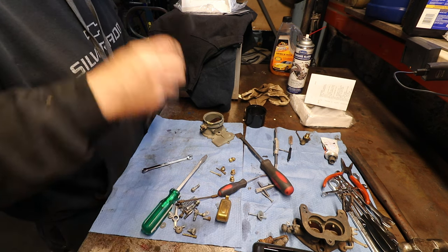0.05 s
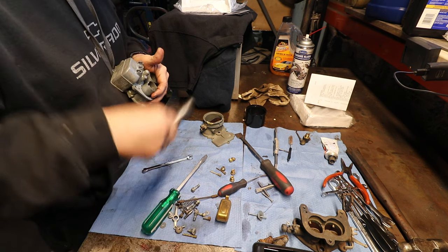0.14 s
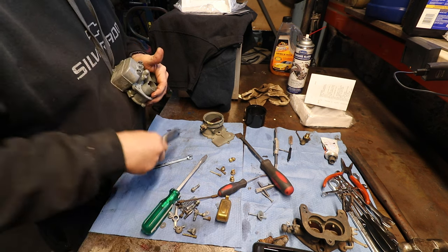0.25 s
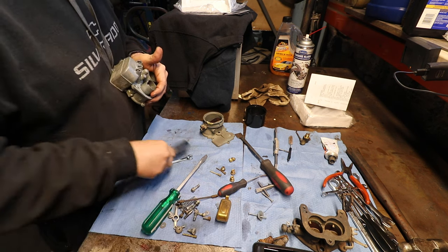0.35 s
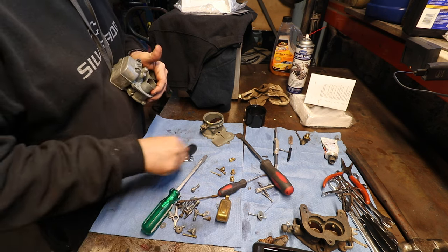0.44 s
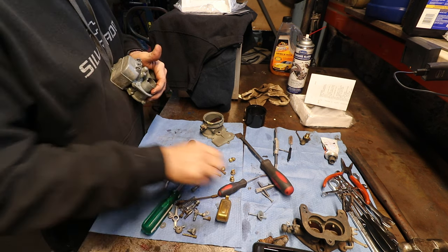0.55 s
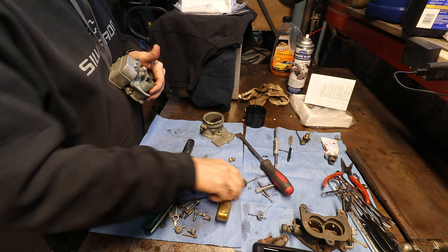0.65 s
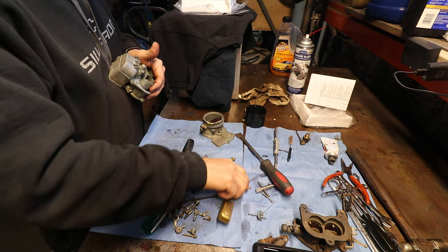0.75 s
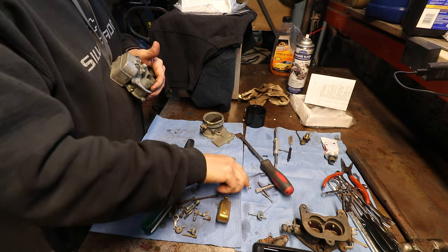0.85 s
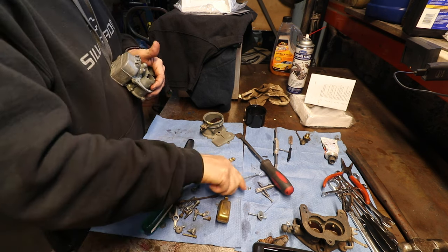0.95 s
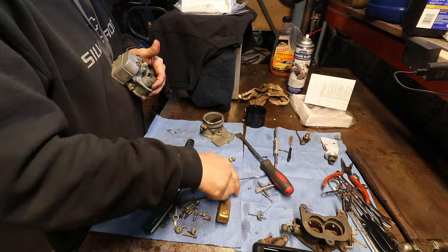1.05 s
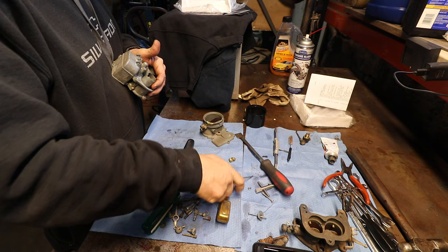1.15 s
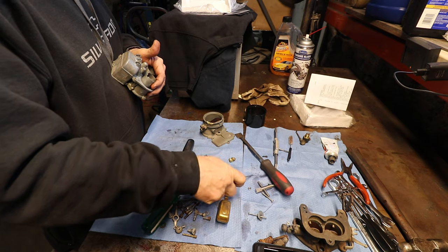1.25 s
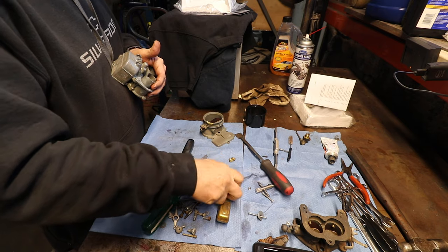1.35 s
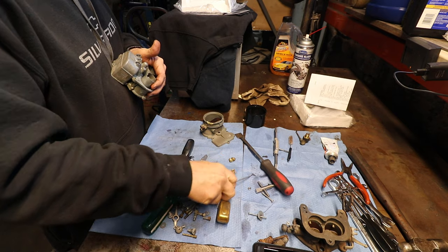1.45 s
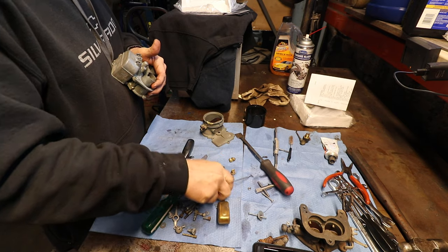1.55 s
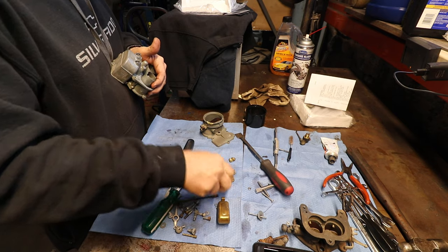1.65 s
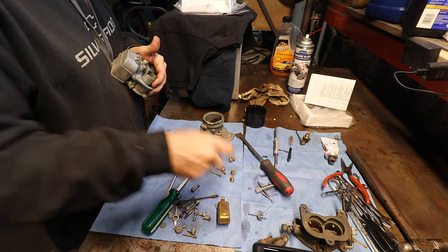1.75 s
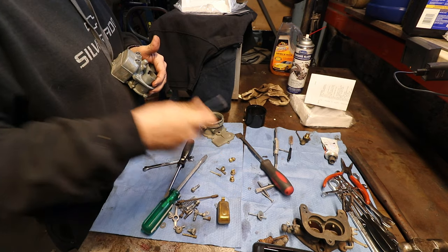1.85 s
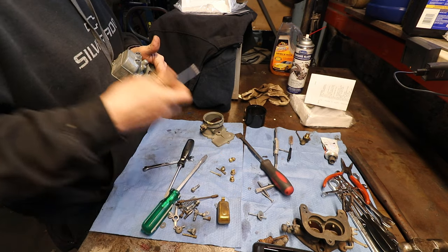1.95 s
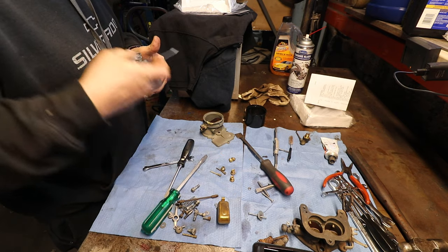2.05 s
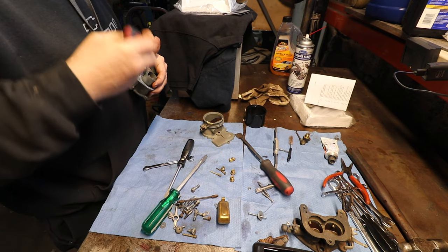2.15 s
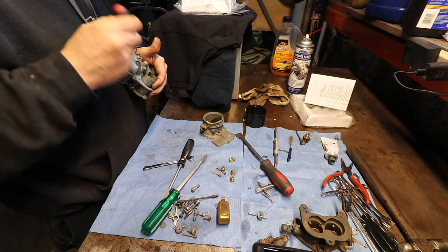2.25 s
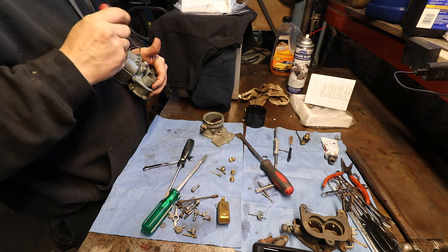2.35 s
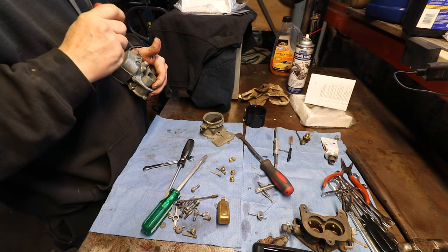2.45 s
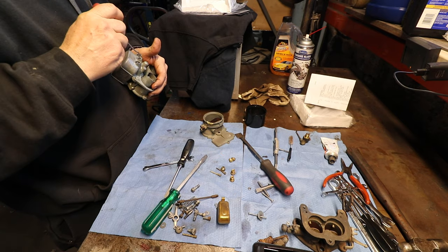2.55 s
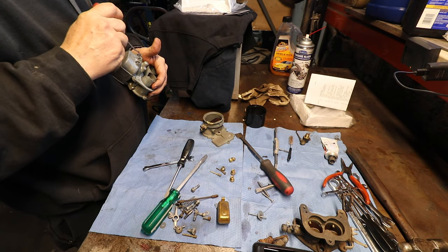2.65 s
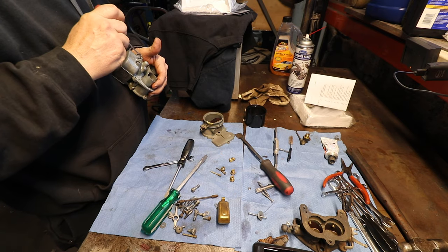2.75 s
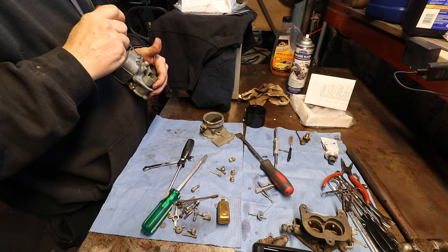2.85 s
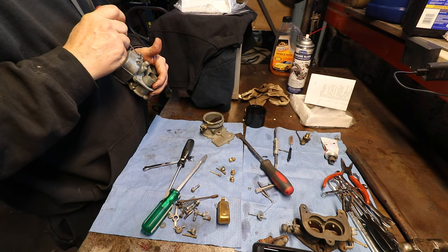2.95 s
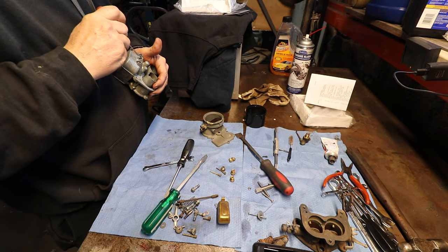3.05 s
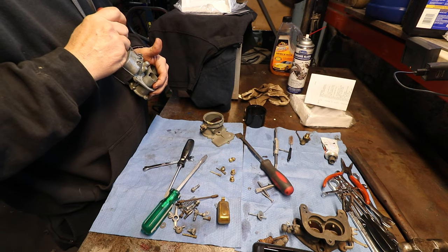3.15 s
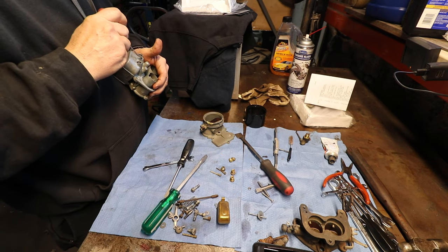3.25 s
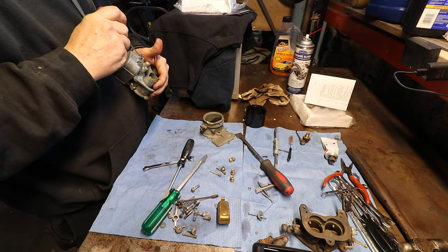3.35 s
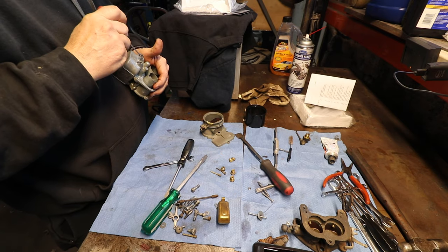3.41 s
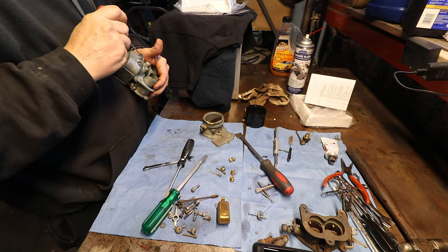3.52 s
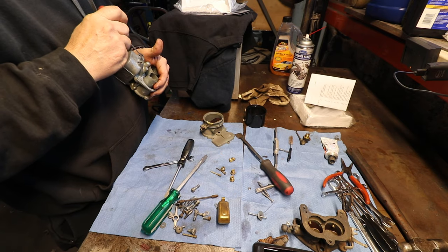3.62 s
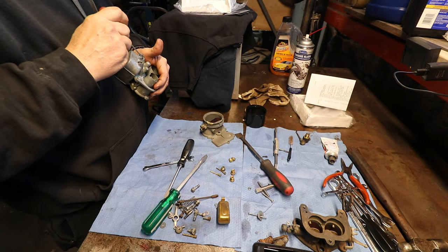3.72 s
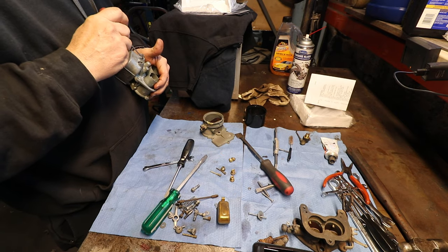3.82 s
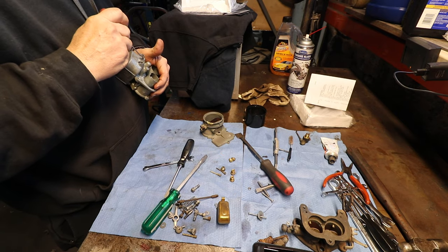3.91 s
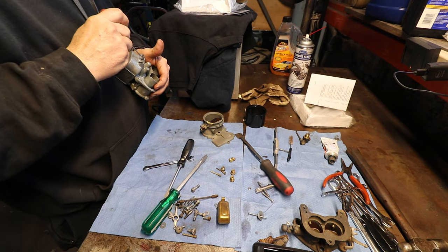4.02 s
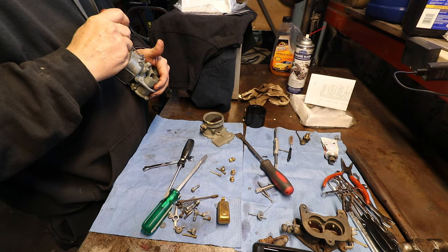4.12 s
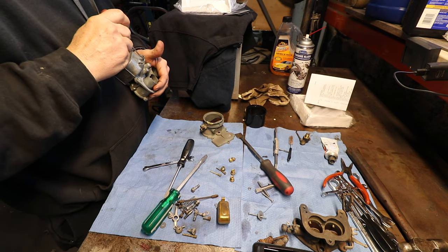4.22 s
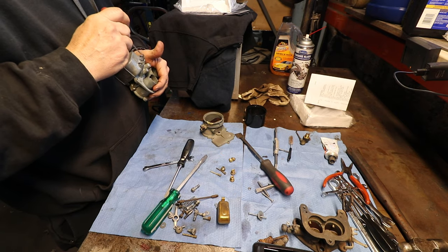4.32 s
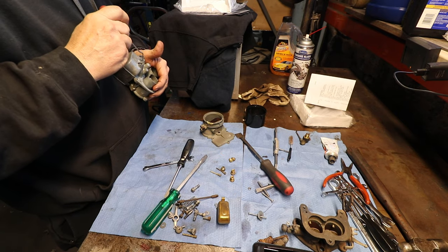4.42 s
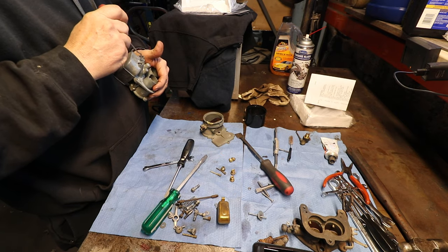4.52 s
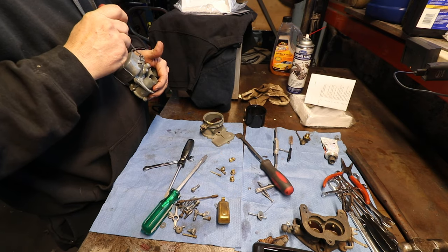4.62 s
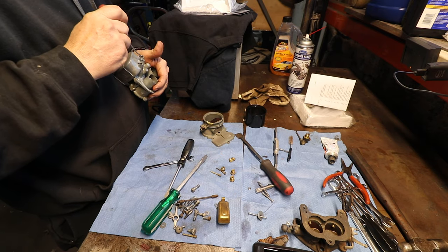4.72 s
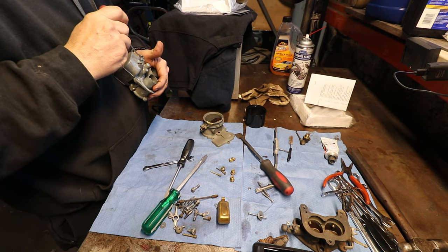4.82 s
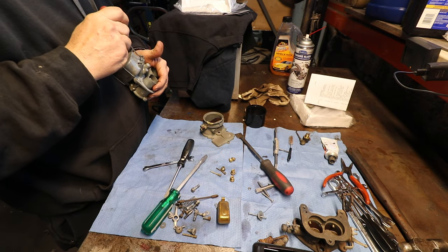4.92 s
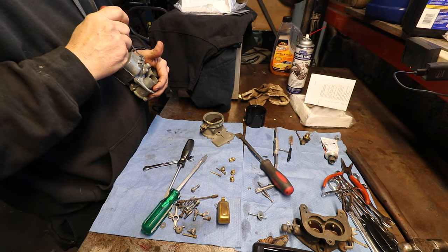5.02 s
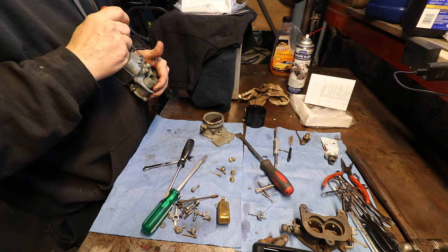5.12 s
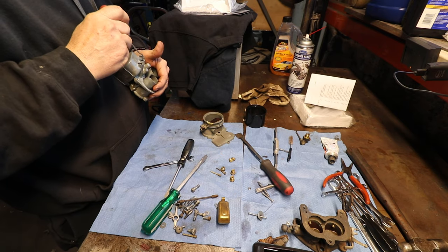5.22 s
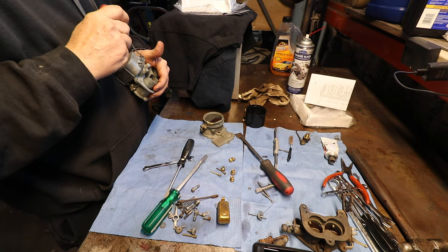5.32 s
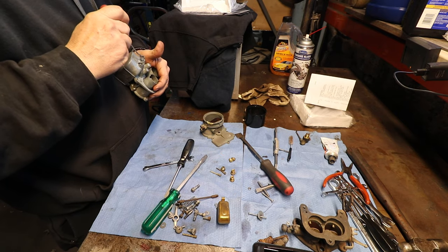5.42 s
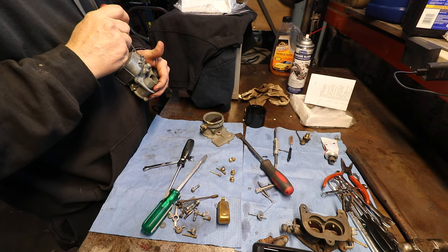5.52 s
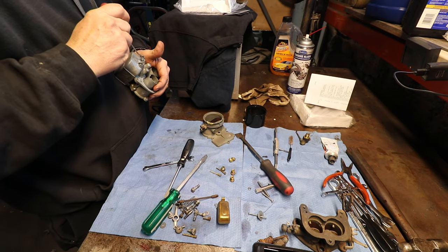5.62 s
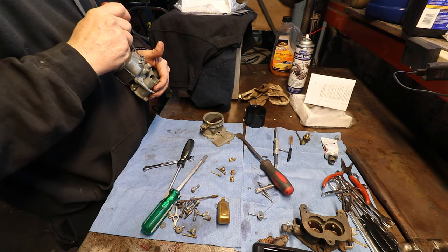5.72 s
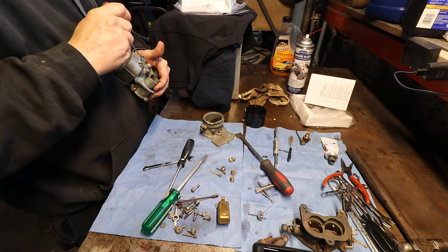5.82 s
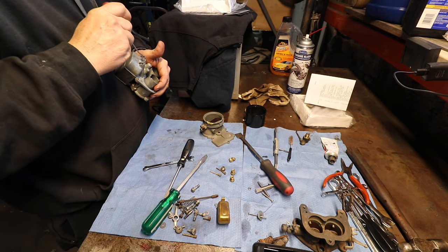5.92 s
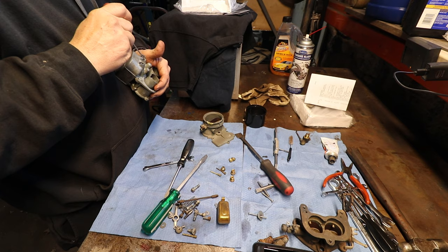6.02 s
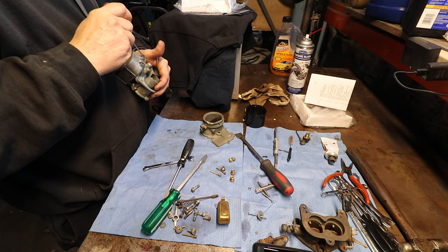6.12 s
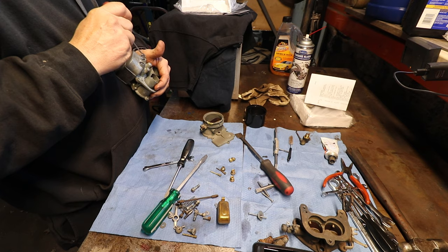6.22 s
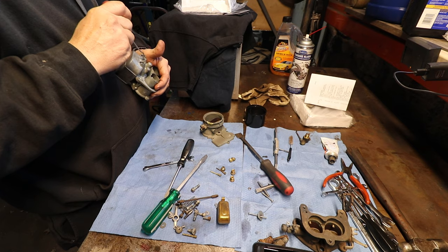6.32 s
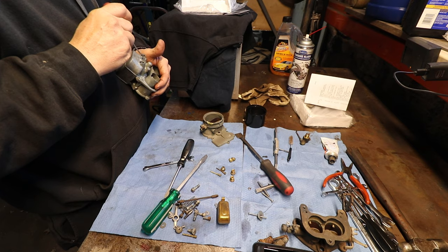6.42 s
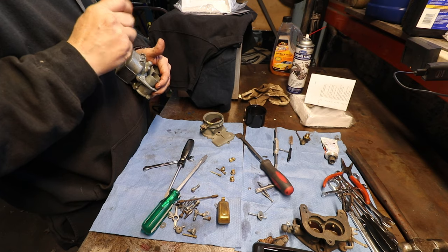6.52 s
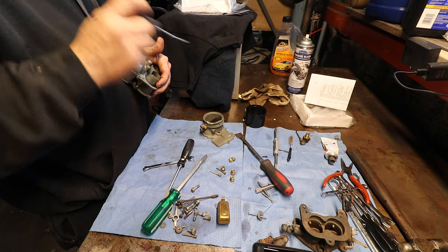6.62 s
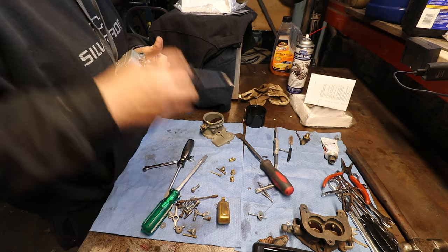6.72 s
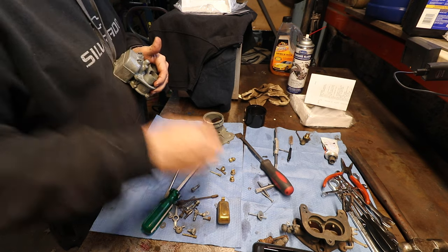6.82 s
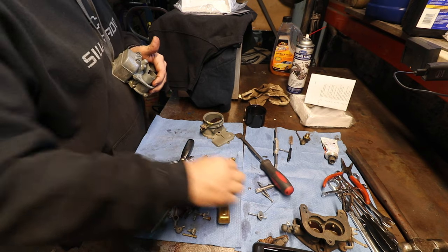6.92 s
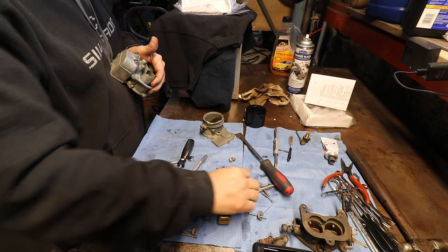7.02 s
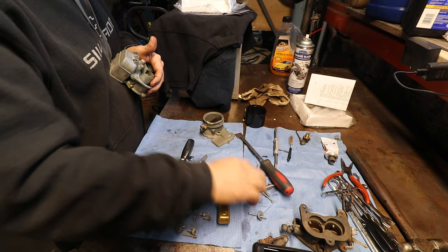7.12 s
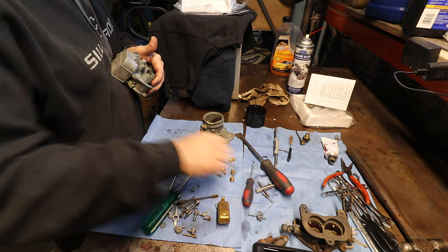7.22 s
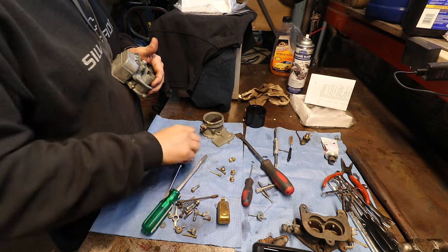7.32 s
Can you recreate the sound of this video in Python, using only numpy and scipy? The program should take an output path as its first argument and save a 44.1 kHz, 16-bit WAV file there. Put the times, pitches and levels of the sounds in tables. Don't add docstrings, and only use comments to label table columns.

```python
import sys
import numpy as np
from scipy import signal
from scipy.fft import rfft, irfft, next_fast_len
from scipy.io import wavfile
from scipy.ndimage import map_coordinates

SR = 44100
rng = np.random.default_rng(int(sys.argv[2]) if len(sys.argv) > 2 else 0)


def volts_from_decibels(level):
    exponent = np.asarray(level, float) / 20
    return 10 ** exponent


def waveform_to_disk(signal):
    frames = np.transpose(np.atleast_2d(signal))
    scaled = np.clip(frames, -1, 1) * 32767
    samples = np.round(scaled).astype(np.int16)
    wavfile.write(sys.argv[1], SR, samples)


N = 324576
T = np.arange(SR // 3) / SR

# [f/Hz, rms level/dB]
HUM = [(60.005, -50), (20, -71), (82.1, -71), (136.8, -74), (155.9, -76), (240, -75), (300, -77)]
# [f/Hz, density/dB per Hz]
AIR = [(10, -31), (24, -26.5), (38, -13), (48, -26.5), (70, -15.5), (110, -15), (135, -13), (267, -20.5),
       (450, -26), (560, -19.5), (889, -21.5), (1720, -30.5), (2400, -34.5), (5000, -39), (16000, -41.5)]
# [f/Hz, width/Hz, level over the air noise/dB]
CASING = [(139, 23.4, 1.5), (304, 12.5, 7), (384.3, 52, 5.5), (526, 54, 4), (750, 10.6, 6.5),
          (892.2, 34.5, 11), (1050, 14, -2), (1120, 18, 1.5), (1253, 18, 6), (1357, 35, 10),
          (2150, 114, 8.5), (2900, 300, 4)]
# [f/Hz, density/dB per Hz]
APART = [(24, -60.5), (40, -28), (185, -3.5), (852, -15.5), (1760, -19.5), (2630, -18), (5720, -13),
         (16000, -15)]
# [t/s, level/dB]
SLEEVE = [(0.0, -64), (0.53, -64), (0.67, -60.5), (0.88, -64), (0.96, -60), (1.35, -64), (1.52, -63),
          (1.76, -61.5), (2.87, -65), (4.78, -65), (4.94, -64), (5.27, -65.5), (6.6, -65.5), (6.8, -64),
          (7.22, -63.5), (7.36, -62.5)]
# [f/Hz, density/dB per Hz]
CLOTH = [(500, -18.5), (1500, -0.5), (3000, 1.5), (6000, -9), (14000, -14)]
# [f/Hz, t60/s]
ROOM = [(150, 0.86), (1000, 0.55), (4000, 0.19), (12000, 0.29)]

# [f/Hz, width/Hz, level/dB]
BENCH_FAR = [(150.8, 82, -8.5), (203, 97, -9), (320.2, 69, -6), (503, 37, -6.5), (695, 66, -4),
             (818.5, 29, -7.5), (900, 72, -4.5), (1046, 260, -13.5), (1450, 100, -15)]
# [f/Hz, width/Hz, level/dB]
BENCH_NEAR = [(124, 67, -9), (244, 89, -0.5), (480, 115, -1.5), (764, 160, -5.5), (970, 280, -13),
              (1420, 350, -22.5)]
# [f/Hz, width/Hz, level/dB]
DROP_CONTACT = [(1400, 940, 2.5), (2400, 1250, 8), (4400, 2700, -0.5)]
# [f/Hz, width/Hz, level/dB]
TOWEL_CONTACT = [(1500, 600, -4), (2180, 580, 7.5), (2900, 940, 4.5), (3600, 500, 0.5)]
# [f/Hz, width/Hz, level/dB]
BIT = [(1400, 630, 7), (2420, 1000, 6), (3280, 820, 5), (4400, 690, 3)]

# [t/s, peak level/dB, clack f/Hz, bench thud level/dB]
DROP_STEEL = [
    (.494, -3.5, 3180, -31),
    (.49492, -9.5, 3260, -24),
    (.5102, -14, 2910, -36),
    (.5628, -9, 4130, -19),
    (.5911, -17.5, 2740, -22.5),
    (.638, -34.5, 3000, -39),
    (.643, -45, 2900, -35),
]
# [t/s, peak level/dB, clack f/Hz, bench thud level/dB]
DROP_HANDLE = [(0.5007, -12.5, 3360, -29.5), (.512, -15.5, 2260, -37), (.517, -23, 2260, -25),
               (.531, -23, 2400, -23), (.549, -25, 2650, -21.5), (.5695, -13, 4230, -23.5),
               (.574, -21.5, 4070, -21), (.583, -26, 3950, -30.5), (.613, -41, 2980, -29.5),
               (0.627, -28, 2330, -30.5), (.634, -26, 2400, -29)]
# [t/s, peak level/dB, clack f/Hz, bench thud level/dB]
LAID_STEEL = [
    (7.2325, -43, 5440, -30.5),
]
# [t/s, peak level/dB, clack f/Hz, bench thud level/dB]
LAID_HANDLE = [
    (7.2296, -40, 2480, -33),
    (7.239, -58, 2000, -36),
    (7.253, -27, 2730, -48),
    (7.253, -32.5, 3470, -48),
    (7.2564, -35, 2190, -39),
    (7.268, -57, 2200, -40),
    (7.30, -56, 2500, -43.5),
]
FIRST_T60_S, T60_GROWS, LAST_T60_S = 0.0092, 0.86, 0.021

SOCKET_HZ = [4167, 4893, 6923, 9216, 10490, 11510, 14660, 7180, 4900, 11510, 14670, 4170]
# [level/dB, start t/s, rise/s, damped from t/s, t60 once damped/s]
SOCKET = [(-33.5, .525, 0.02, .585, 0.076), (-32, .522, .04, 0.58, 0.21), (-33.5, .512, .009, .568, .04),
          (-42.5, .505, 0.034, 0.58, .08), (-48.5, .505, .01, .585, .3), (-40, .495, .04, 0.59, .09),
          (-43, .5, .012, .518, .07), (-47, .563, .002, 0.567, .15), (-34, .497, .01, .515, .05),
          (-58, .615, .02, 0.69, .08), (-46, .548, .012, .565, .2), (-59, 0.54, .01, .63, .3)]
FREE_T60_S = 1.5

# [t/s, f/Hz, level/dB, t60/s]
PINGS = [(.494, 4900, -14.5, 0.0083), (.494, 5500, -24, 0.0089), (.592, 7200, -31.5, 0.048),
         (0.639, 7150, -54, 0.045), (.7415, 1736, -56, 0.39), (.7415, 1960, -49, 0.34),
         (1.565, 3200, -56, 0.6), (1.55, 1860, -46, .06), (.8, 4970, -51, 0.12), (.95, 6560, -43, .05),
         (.795, 14060, -63, 0.074), (.797, 7800, -59, .08)]
# [t/s, f/Hz, level/dB, t60/s]
SLIDES = [(.7403, 4500, -38, .006), (.742, 9500, -55, .15), (.772, 3456, -52, .1), (.797, 3854, -50, .06),
          (.772, 5800, -57, 0.077), (.76, 3500, -58, .7), (.96, 3590, -57, 0.37), (1.543, 2850, -46, .03),
          (1.543, 9500, -55, .12), (1.545, 11690, -60, .1), (1.55, 4970, -54, .1), (1.575, 1900, -56, .45),
          (1.56, 2974, -50, .2), (1.707, 9200, -50, .02)]
# [t/s, f/Hz, level/dB, t60/s]
BOOMS = [(0.4942, 339, -21, 0.054), (.4945, 480, -22, 0.047), (.549, 334, -24, 0.044),
         (.549, 500, -25, 0.049), (.564, 1000, -24, .03), (.567, 700, -27, 0.072), (.573, 881, -19, 0.049),
         (.585, 912, -21.5, 0.06), (.57, 150.6, -35.5, 0.34), (.58, 200, -36, 0.32),
         (.6, 1050, -32.5, 0.095), (.612, 309, -32, 0.11), (.615, 800, -36, 0.089), (.642, 845, -35, 0.13),
         (.7, 883, -41, .1), (.722, 812, -46.5, 0.57), (1.02, 189, -46.5, 0.15), (7.2295, 269, -29, .07),
         (7.2297, 490, -38, .04), (7.238, 480, -30, .04), (7.235, 177, -37.5, .15), (7.24, 110, -44, .2),
         (7.266, 300, -34, .1), (7.284, 239, -40, .1)]
# [t/s, f/Hz, level/dB, t60/s]
SETTLES = [(7.232, 9200, -57, .09), (7.254, 9350, -58, .032), (7.233, 10500, -53, .025),
           (7.234, 15200, -49, .07), (7.234, 5760, -57, .05), (7.2535, 2650, -39, .05)]
# [t/s, f/Hz, level/dB, t60/s]
SPITS = [(.494, 6450, -24, .014), (.494, 9340, -37.5, .019), (.494, 11600, -34, .02),
         (.494, 12850, -36, .02), (.51, 8300, -42.5, .03), (.51, 12400, -42, .025), (.563, 7262, -36, .035),
         (.563, 8683, -42.5, .025), (.563, 11660, -38, 0.022), (.563, 14710, -38, .025)]

# [t/s, length/s, level/dB, f/Hz]
RUSTLES = [(.497, 0.049, -47, 2280), (.565, .06, -44, 2080), (.745, .13, -52.5, 4200),
           (.83, 0.17, -69, 3500), (1.5, 0.042, -64, 3700), (1.54, 0.043, -52.5, 3300),
           (1.87, 0.13, -60.5, 4040), (2.82, 0.039, -65, 2900), (4.335, .09, -61, 4200),
           (4.97, 0.13, -66, 4000), (1.543, .05, -62, 10000), (.745, .13, -62, 2950),
           (.595, .06, -48, 1900), (6.63, 0.19, -62, 3200)]
# [t/s, length/s, level/dB, f/Hz]
BRUSHES = [
    (1.13, 0.093, -58.5, 6000),
    (1.181, 0.033, -58.5, 4760),
    (1.703, .036, -53.5, 5000),
]
# [t/s, length/s, level/dB, f/Hz]
GRINDS = [(4.334, 0.05, -59, 3800), (4.385, .04, -64, 3800), (4.975, .065, -65, 3470),
          (5.05, 0.037, -66, 3800), (3.22, 0.015, -60.5, 3300), (6.038, .014, -61, 3300),
          (6.062, .008, -61.5, 3500), (.632, .02, -47.5, 2900), (7.253, .012, -52, 3500)]
# [t/s, length/s, level/dB, start f/Hz, end f/Hz]
SQUEAKS = [
    (1.708, 0.025, -64, 2900, 2700),
    (4.335, .022, -63.5, 3100, 3150),
    (4.362, .02, -60, 3030, 3100),
    (4.386, 0.044, -60, 3030, 2700),
    (4.338, .075, -73, 4500, 4200),
]
SAG, RUSTLE_OCT, BRUSH_OCT, SQUEAK_OCT, GRIND_OCT = .86, 0.48, .8, 0.09, 0.23

LONG_HZ = [3548, 3601, 3900, 4280, 4970, 5373, 6180, 7375, 8037, 9450, 10590, 12150, 13200, 15300]
SHORT_HZ = [1976, 2974, 4970, 4280, 6470, 6891, 7070, 7800, 8775, 10140, 11690, 14060, 1736]
# [level/dB, t60/s]
LONG = [(-0.5, 0.17), (1, 0.18), (-21, .22), (-22, 0.16), (-15, 0.11), (-23, 0.16), (-14, .07), (-20, .1),
        (-21.5, .2), (-7.5, 0.06), (-20, 0.089), (-9, 0.048), (-19, 0.044), (-22, .06)]
# [level/dB, t60/s]
SHORT = [(-4.5, 0.31), (-1, 0.23), (-11, 0.13), (-19, .23), (-15, .08), (-11.5, 0.14), (-15, .1), (-25, .1),
         (-12.5, 0.1), (-16, .076), (-10.5, .079), (-24, .05), (-24, 0.28)]
# [t/s, level/dB]
CLINKS = [
    [(.7405, -33), (.7435, -34), (.7715, -44), (.792, -49), (.8, -45), (.833, -53), (.852, -60)],
    [(.9485, -43), (.9497, -26.5)],
    [(1.543, -52), (1.5484, -46), (1.553, -41)],
    [(1.5594, -35.5), (1.565, -43)],
]
# [long shaft/dB, its twin mode/dB, its treble/dB, short shaft/dB, share of the free t60]
SPOTS = [(5, -7.5, -7, -20, 0.62), (0, 2, 0, -7.5, 0.99), (-4, -15, -3, -4, 0.9), (-16, -1, 10, 0, 1.12)]
TREBLE_HZ = 5500

# [t/s, peak level/dB, f/Hz, t60/s]
TICKS = [(1.0234, -42, 2100, .015), (1.3542, -45, 2540, .012), (1.3542, -49, 4500, .015),
         (1.708, -42, 2800, .015), (1.715, -46, 2930, .015), (1.7195, -43, 2630, .012),
         (2.003, -44.5, 3050, .015), (3.104, -53, 4300, .015), (3.1516, -44, 2350, .01),
         (3.1516, -44, 1200, .015), (3.1562, -46, 2410, .015), (3.1562, -50, 4400, .015),
         (3.203, -41, 3760, .015), (3.203, -44, 2480, .015), (3.203, -46, 4400, .015),
         (3.222, -50, 4400, .015), (3.225, -45, 2260, .015), (3.228, -48, 3200, .015),
         (3.23, -44, 1400, .02), (3.429, -42.5, 4520, .02), (3.925, -46.5, 3730, .01),
         (3.928, -51, 3750, .02), (3.928, -50, 2600, .015), (3.9557, -46, 2220, .01),
         (3.9557, -50.5, 3700, .01), (4.3362, -49, 4500, .03), (4.3565, -36, 3080, .008),
         (4.431, -42.5, 3770, .015), (4.431, -47, 4300, .015), (4.8094, -46, 3750, 0.027),
         (4.8092, -49, 2400, .02), (5.003, -51, 2970, .015), (5.017, -50, 3400, .015),
         (5.053, -48, 2240, .02), (5.053, -49.5, 3600, .03), (5.088, -51, 2260, .03),
         (5.4704, -43, 3750, 0.025), (5.4706, -44.5, 2370, .025), (5.477, -49.5, 2370, .02),
         (5.8306, -44.5, 3200, .007), (5.8315, -48, 4300, .012), (6.041, -43, 2500, .012),
         (6.0488, -44, 2280, 0.014), (6.067, -41, 2130, .012), (6.0987, -39, 4510, .02),
         (6.0996, -42, 2000, .01), (6.5245, -51.5, 2240, .015)]
TICK_T60_S, TICK_CRACK_DB, TICK_GRIT_DB, TICK_RING_DB = 0.014, -19, -4, -2
# [t/s, level/dB, f/Hz]
KNOCKS = [
    (1.03, -37, 900),
    (3.965, -34, 866),
    (6.0183, -36.5, 924),
]
KNOCK_T60_S = 0.035
# [t/s, level/dB, lowest mode level/dB, treble modes level/dB]
SEATS = [(2.8237, -60.5, 10, -12), (3.247, -62, -11, -11), (3.429, -44, -4, -3.5), (5.47, -66, 5, -16),
         (6.048, -55, 1, -12), (6.073, -47, -10, -14), (6.0988, -41, -5, 0.5)]
# [f/Hz, level/dB, t60/s]
CASTING = [(2370, -4, 0.097), (4550, -3, 0.068), (4840, -10, 0.059), (6000, -16, .07), (7230, -15, 0.06),
           (7920, -4, 0.021), (8880, -11, 0.032), (9970, -16.5, 0.035), (12500, -10, 0.045),
           (12860, -17, .045), (14000, -12, .03)]
TOP_HZ = 15830


def unit(x):
    return x / np.sqrt(np.mean(x ** 2) + 1e-20)


def along(points, hz):
    f, v = np.transpose(points)
    return np.interp(np.log(hz + 1), np.log(f + 1), v)


def wobble(rate):
    knots = rng.standard_normal(int(N * rate / SR) + 4)
    return map_coordinates(knots, [np.arange(N) * rate / SR])


def filtered(x, response):
    m = next_fast_len(len(x) + SR // 2)
    return irfft(rfft(x, m) * response(np.fft.rfftfreq(m, 1 / SR)), m)[:len(x)]


def modes(peaks):
    def response(f):
        return sum((-1) ** k * volts_from_decibels(db) * 1j * f * w / (c * c - f * f + 1j * f * w)
                   for k, (c, w, db) in enumerate(peaks))
    return response


def fade(t60):
    return volts_from_decibels(-60 * T / max(t60, .002))


def ring(hz, t60):
    return np.sin(2 * np.pi * hz * T) * fade(t60) * (1 - np.exp(-T / 0.0001))


def add(x, s, sound):
    part = x[round(s * SR):][:len(sound)]
    part += sound[:len(part)]


def heater():
    t = np.arange(N) / SR

    def colour(f):
        bumps = sum(db / (1 + (2 * (f - c) / w) ** 2) for c, w, db in CASING)
        return volts_from_decibels(along(AIR, f) + bumps)

    air = volts_from_decibels(-53.5) * unit(filtered(rng.standard_normal(N), colour))
    fan = volts_from_decibels(-54.5 + 2.5 * wobble(4)) * np.sin(2 * np.pi * 28.55 * t + .8 * wobble(1.5))
    hum = sum(volts_from_decibels(db + 3) * np.sin(2 * np.pi * hz * t + 1.24) for hz, db in HUM)
    return air + fan + hum


def sleeves():
    s, db = np.transpose(SLEEVE)
    power = volts_from_decibels(2 * np.interp(np.arange(N) / SR, s, db))
    over = np.sqrt(np.clip(power - volts_from_decibels(2 * -66.5), 0, 1))
    cloth = unit(filtered(rng.standard_normal(N), lambda f: volts_from_decibels(along(CLOTH, f))))
    return over * volts_from_decibels(-0.5 + 0.72 * wobble(15)) * cloth


def cracks(rows, t60, grit_db, band):
    mid, top = np.zeros(N), np.zeros(N)
    size = SR // 10
    for s, db, life, crack_db in rows:
        add(mid, s, volts_from_decibels(db + grit_db) * fade(1.32 * life)[:size] * rng.standard_normal(size))
        add(top, s, volts_from_decibels(db + crack_db + 1.5) * fade(t60)[:size] * rng.standard_normal(size))
    mid = filtered(filtered(mid, modes(band)), modes([(3000, 6400, 0.0014)]))
    treble = modes([(10500, 10800, 0)])
    return mid + filtered(filtered(top, treble), treble)


def driver(steel, handle, bench, band, thud_t60, thud_gain_db, grit_db, steel_db, handle_db):
    clack, push, contacts = np.zeros(N), np.zeros(N), []
    first = min(steel + handle)[0]
    for rows, crack_db in ((steel, steel_db), (handle, handle_db)):
        for s, db, hz, thud_db in rows:
            t60 = min(FIRST_T60_S + T60_GROWS * (s - first), LAST_T60_S)
            overtone = 0.18 * ring(1.51 * hz, 0.25 * t60)
            undertone = 0.12 * ring(0.62 * hz, 1.4 * t60)
            add(clack, s, volts_from_decibels(db - 1.5) * (ring(hz, t60) + overtone + undertone))
            rattle = fade(thud_t60) * rng.standard_normal(len(T))
            blow = 2 * fade(0.0019)
            add(push, s, volts_from_decibels(thud_db + thud_gain_db) * (rattle - blow))
            contacts.append((s, db, t60, crack_db))
    thud = filtered(push, lambda f: modes(bench)(f) * (1j * f / (90 + 1j * f)) ** 2)
    return clack + cracks(contacts, 0.011, grit_db, band) + thud


def loose_modes():
    out = np.zeros(N)
    for s, hz, db, t60 in PINGS + SLIDES + BOOMS + SETTLES + SPITS:
        add(out, s, volts_from_decibels(db) * ring(hz, t60))
    return out


def socket():
    out = np.zeros(N)
    for hz, (db, s, rise, damped_s, lying) in zip(SOCKET_HZ, SOCKET):
        swell = np.sin(np.pi / 2 * np.clip(T / rise, 0, 1)) ** 2
        damped = volts_from_decibels(-60 * np.clip(T + s - damped_s, 0, 1) / lying)
        add(out, s, volts_from_decibels(db) * swell * damped * ring(hz, FREE_T60_S))
    return out * volts_from_decibels(1.6 * wobble(70.3))


def rubs(count=130):
    out, t = np.zeros(N), T[:SR // 100]
    strokes = []
    for rows, spread in ((RUSTLES, RUSTLE_OCT), (BRUSHES, BRUSH_OCT), (GRINDS, GRIND_OCT)):
        strokes += [(s, length, db, hz, SAG * hz, spread) for s, length, db, hz in rows]
    strokes += [(s, length, db - 4, *hz, SQUEAK_OCT) for s, length, db, *hz in SQUEAKS]
    for s, length, db, start_hz, end_hz, spread in strokes:
        where, pitch, size = rng.random(count), rng.standard_normal(count), rng.exponential(size=count)
        drift = start_hz + (end_hz - start_hz) * where
        hz = np.clip(drift * 2 ** (spread * pitch), 300, 15500)
        cycles = 3.2 + 0.2 / spread
        for u, f, g in zip(where, hz, size):
            level = volts_from_decibels(db + 0.5 + 0.81 * g) * np.sin(np.pi * u) ** .5
            add(out, s + u * length, level * np.sin(2 * np.pi * f * t) * np.exp(-t * f / cycles))
    return out


def shaft(modes_hz, levels, extra_db, free):
    sound = np.zeros(len(T))
    for k, (hz, (db, t60), more) in enumerate(zip(modes_hz, levels, extra_db)):
        held_and_free = ring(hz, 0.96 * free * t60) + 0.23 * ring(hz, 1.65 * free * t60)
        sound += (-1) ** k * volts_from_decibels(db + more) * held_and_free
    return sound


def shafts():
    out, hz = np.zeros(N), np.array(LONG_HZ)
    for hits, (long_db, twin_db, treble_db, short_db, free) in zip(CLINKS, SPOTS):
        extra_db = long_db + twin_db * (hz == hz[1]) + treble_db * (hz > TREBLE_HZ)
        sound = shaft(hz, LONG, extra_db, free)
        sound = sound + shaft(SHORT_HZ, SHORT, np.full(len(SHORT), short_db), free)
        for s, db in hits:
            fizz = np.diff(rng.standard_normal(len(T) + 1))
            add(out, s, volts_from_decibels(db - 7.5) * (sound + .09 * fade(.06) * fizz))
    return out


def screw():
    out = np.zeros(N)
    for s, db, hz, t60 in TICKS:
        add(out, s, volts_from_decibels(db + TICK_RING_DB) * ring(hz, t60))
    for s, db, hz in KNOCKS:
        add(out, s, volts_from_decibels(db - 6.5) * ring(hz, KNOCK_T60_S))
    for s, db, low_db, treble_db in SEATS:
        body = sum(volts_from_decibels(level + low_db * (c < 3000) + treble_db * (c > 5500)) * ring(c, life)
                   for c, level, life in CASTING)
        contact = fade(0.019)[:300] * rng.standard_normal(300)
        contact[0] = 20
        add(out, s, volts_from_decibels(db) * np.convolve(body[:SR // 6], contact / np.linalg.norm(contact)))
        add(out, s, volts_from_decibels(db + treble_db - 7) * fade(0.032) * rng.standard_normal(len(T)))
    contacts = [(s, db, TICK_T60_S, TICK_CRACK_DB) for s, db, *_ in TICKS]
    return out + cracks(contacts, .015, TICK_GRIT_DB, BIT)


def squeal():
    out, slips = np.zeros(N), volts_from_decibels(5.0 * wobble(300))
    for s, length, db, start_hz, end_hz in SQUEAKS:
        u = np.arange(round(length * SR)) / (length * SR)
        cycles = length * (start_hz * u + (end_hz - start_hz) * u ** 2 / 2)
        add(out, s, volts_from_decibels(db + 4.5) * np.sin(np.pi * u) ** .5 * np.sin(2 * np.pi * cycles))
    return out * slips


def room(x):
    hz, t, z = signal.stft(rng.standard_normal(SR // 2), SR, nperseg=256)
    tail = signal.istft(z * volts_from_decibels(-60 * t / along(ROOM, hz)[:, None]), SR, nperseg=256)[1]
    late = np.pad(x, (260, 0))
    return signal.fftconvolve(late, tail / np.linalg.norm(tail))[:N]


def scene():
    dropped = driver(DROP_STEEL, DROP_HANDLE, BENCH_FAR, DROP_CONTACT, thud_t60=0.1, thud_gain_db=11.5,
                     grit_db=-6.0, steel_db=-20, handle_db=-37)
    laid = driver(LAID_STEEL, LAID_HANDLE, BENCH_NEAR, TOWEL_CONTACT, thud_t60=0.13, thud_gain_db=16.5,
                  grit_db=-1, steel_db=-3.0, handle_db=-38)
    near = dropped + laid + loose_modes() + socket() + rubs() + shafts() + screw() + squeal()
    mono = near + volts_from_decibels(-13.5) * room(near) + heater() + sleeves()
    return np.array([mono, mono])


def roll_off(x):
    return signal.sosfilt(signal.butter(12, 16820, fs=SR, output="sos"), x)


def record(dry):
    side = volts_from_decibels(-75.5) * unit(filtered(rng.standard_normal(N), lambda f: volts_from_decibels(along(APART, f))))
    side = side + volts_from_decibels(-47) * np.roll(dry[0], 40)
    pair = [filtered(x, lambda f: np.where(f < TOP_HZ, 1, volts_from_decibels(-40.5))) for x in dry + [side, -side]]
    return roll_off(np.array(pair))


dry = scene()
out = record(dry)
waveform_to_disk(out)
```